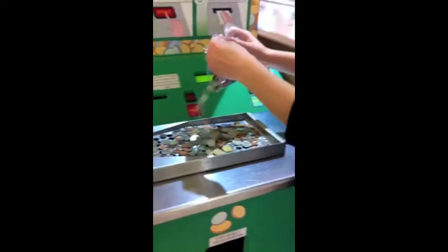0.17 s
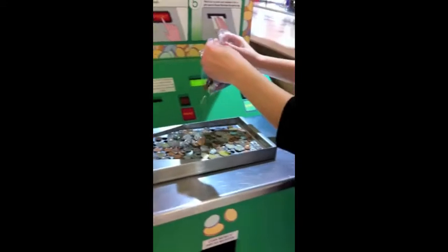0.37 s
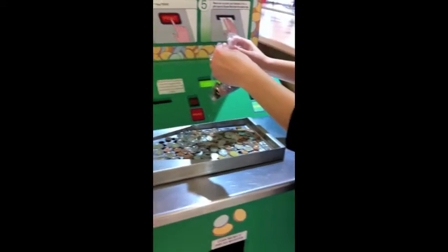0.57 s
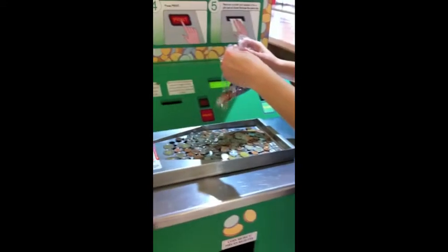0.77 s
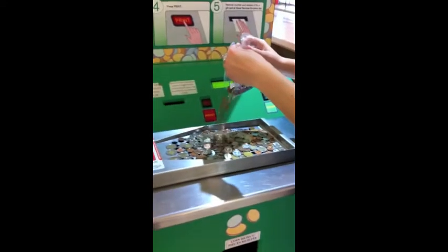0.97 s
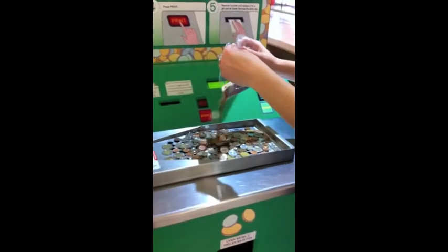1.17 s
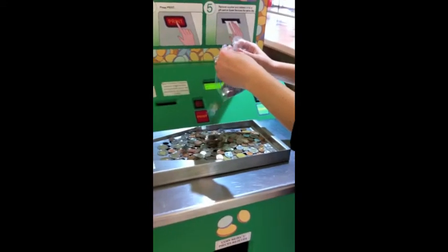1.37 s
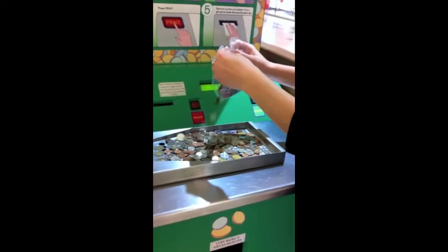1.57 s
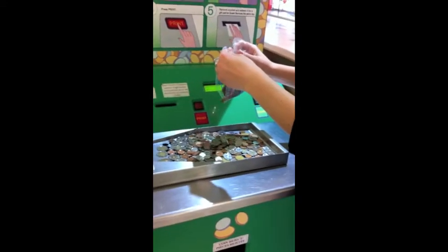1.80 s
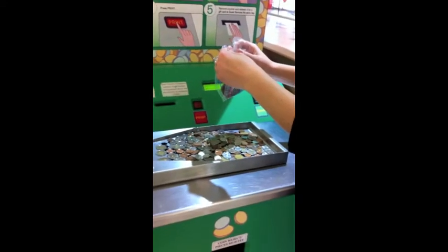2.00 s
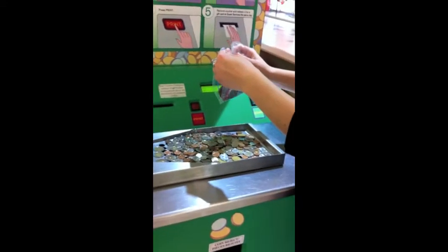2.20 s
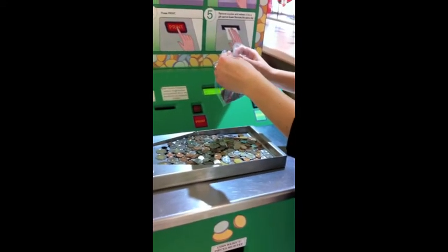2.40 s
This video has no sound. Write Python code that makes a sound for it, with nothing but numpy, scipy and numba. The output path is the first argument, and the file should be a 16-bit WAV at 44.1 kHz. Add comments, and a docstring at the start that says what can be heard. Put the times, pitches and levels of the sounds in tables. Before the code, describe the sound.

Coins pour from a bag onto a heap in a steel tray, clattering and jingling.

```python
"""Coins are shaken out of a bag onto a heap of coins in the steel tray of a counting machine, indoors.
After a faint rustle of the bag they land in clumps, each a quick flurry of hits, while loose coins
trickle and slide in between. Every hit clacks, rings a coin and knocks the tray, and heavier clumps
thud the cabinet. The room adds a short echo and a low, steady rumble."""
import sys
import numpy as np
from scipy import signal
from scipy.fft import rfft, irfft
from scipy.io import wavfile
from numba import njit

SR = 44100
rng = np.random.default_rng(int(sys.argv[2]) if len(sys.argv) > 2 else 0)


def wav_out(sig):
    """Save sig, one row per channel (or a flat mono array), as 16-bit PCM at SR to the path in sys.argv[1]."""
    wavfile.write(sys.argv[1], SR, np.round(np.clip(np.atleast_2d(sig).T, -1, 1) * 32767).astype(np.int16))


N = 108045

# Table levels are relative. A ring time (t60) is how long a sound takes to die down by 60 dB.
# A faint rustle of the bag (first row), then clumps of coins landing:
# t/s, coin level/dB, tray level/dB, time for the flurry to thin to about a third/s
FLURRIES = [(0.1806, -34, -35, 0.0072), (0.2259, -11.5, -29, 0.007), (0.3054, -13.5, -27, 0.0061),
            (0.312, -6, -38, 0.0046), (0.3465, -11, -30, 0.0066), (0.377, -9.5, -33, 0.0066),
            (0.386, -19.5, -45, 0.0053), (0.4694, -13, -27, 0.0063), (0.4823, -7.5, -26.5, 0.0064),
            (0.507, -14, -47, 0.0083), (0.5901, -10, -36, 0.0055), (0.6288, -18, -57, 0.008),
            (0.6718, -14.5, -36, 0.0068), (0.766, -10.5, -27, 0.0067), (0.8458, -9.5, -25.5, 0.0065),
            (0.9297, -16.5, -32.5, 0.0065), (1.0161, -14, -31.5, 0.009), (1.0265, -8.5, -26.5, 0.0063),
            (1.0442, -9, -35, 0.0061), (1.0824, -14.5, -48, 0.0063), (1.1008, -10.5, -46, 0.0078),
            (1.1335, -10.5, -48, 0.0065), (1.1562, -11.5, -32, 0.0054), (1.2103, -14.5, -33, 0.0054),
            (1.3018, -15.5, -25, 0.0091), (1.3171, -11, -35, 0.0061), (1.3556, -11.5, -40, 0.006),
            (1.4036, -14.5, -31, 0.0054), (1.5058, -11, -23.5, 0.007), (1.5156, -9, -45, 0.0058),
            (1.6023, -11, -29, 0.0071), (1.7439, -11.5, -29, 0.0063), (1.7905, -20.5, -36, 0.0065),
            (1.857, -14, -33, 0.0059), (1.8947, -20.5, -34.5, 0.0058), (1.921, -19, -37, 0.0046),
            (1.9671, -9.5, -23.5, 0.0057), (2.0217, -15.5, -38, 0.0066), (2.062, -23.5, -36, 0.0055),
            (2.1256, -21, -32.5, 0.0079), (2.1428, -14, -34.5, 0.0067), (2.1976, -25, -41, 0.0065),
            (2.2349, -48, -32.5, 0.0061), (2.2885, -35, -45, 0.0079), (2.306, -36, -46, 0.0049),
            (2.3344, -31, -50, 0.0056), (2.3506, -31, -58, 0.0077), (2.384, -37, -47.5, 0.0055)]

def flurries(hits=36, scatter_db=5, gain_db=-7):
    """The bag's rustle and each clump are hits that thin out. Gives times, force on coins, on tray."""
    all_hits = []
    for start, coin_db, tray_db, thinning_s in FLURRIES:
        share_done = (np.arange(hits) + rng.random(hits)) / (hits + 1)
        times = start - thinning_s * np.log(1 - share_done)
        force = unit(gain(scatter_db * rng.standard_normal(hits))) * rng.choice([-1, 1], hits)
        force *= np.sqrt(2 * thinning_s * SR) * gain(gain_db)
        all_hits.append([times, force * gain(coin_db), force * gain(tray_db)])
    return np.hstack(all_hits)


# How strongly the loose coins trickle and slide: t/s, level/dB
LOOSE_FLOW = [(0.02,-42.5),(.08,-42.5),(.16,-37.5),(.29,-79),(.36,-19),(.5,-21.5),(.57,-21.5),(.66,-27.5),(.74,-33.5),(.91,-31),(1.0,-24),(1.05,-21.5),(1.15,-16.5),(1.28,-23.5),(1.35,-18.5),(1.43,-21),(1.49,-35.5),(1.55,-21),(1.72,-27),(1.81,-23.5),(1.95,-55),(2.05,-26),(2.1,-34.5),(2.18,-32.5),(2.23,-44.5),(2.39,-49.5),(2.43,-75)]

def trickle(hits=3600, hits_per_s=800, scatter_db=5, coin_db=-3.5, tray_db=-25.5):
    """Loose coins hit at random moments, harder while more of them flow."""
    times = np.cumsum(rng.exponential(1, hits)) / hits_per_s
    scatter = np.clip(rng.standard_normal(hits), -2, 2)
    force = unit(gain(scatter_db * scatter)) * rng.choice([-1, 1], hits)
    flow_db = np.interp(times, *np.array(LOOSE_FLOW).T)
    force *= np.sqrt(hits * SR / hits_per_s) * gain(flow_db)
    return np.array([times, force * gain(coin_db), force * gain(tray_db)])


# The bright tone of one coin clacking on another: f/Hz, level/dB
CLACK_TONE = [(60,-46),(300,-33),(700,-16),(1500,-13),(2500,-13.5),(3500,-12),(5000,-5.5),(7000,-6),(8500,-6),(10800,1),(12500,-2),(14000,-5),(15600,1)]

def clacks(times, force, groups=8, rattle_t60=0.061, rattle_db=3, gain_db=-4.5):
    """Every hit is a hard clack with a tiny rattle of the coins around it."""
    clatter = np.zeros(N)
    for k in range(groups):  # each group of hits gets a rattle of its own
        pushes = clicks(times[k::groups], force[k::groups])
        rattle = unit(noise_burst(rattle_t60))
        clatter += pushes + gain(rattle_db) * through(pushes, rattle)
    return gain(gain_db) * through(clatter, tone_filter(CLACK_TONE))


# The pitch ranges in which coins ring: lowest f/Hz, highest f/Hz, level/dB
COIN_PITCHES = [(2919,7600,-4.5),(6823,11500,-2.5),(10500,15000,2.5),(12670,18000,-5.5)]

def jingle(times, force, typical_t60=0.053, spread=0.35, gain_db=-4.5):
    """Every struck coin rings at its own pitches, one picked at random from each range."""
    # Ring times vary by chance: short for a coin lying in the heap, longer for one flying free.
    t60 = typical_t60 * np.exp(spread * np.clip(rng.standard_normal(len(times)), -2, 2))
    decay = np.log(1000) / (t60 * SR)
    starts = np.maximum(times * SR, 0).astype(int)
    lengths = (t60 * SR).astype(int)
    low, high, db = np.array(COIN_PITCHES).T
    pitches = low + (high - low) * rng.random((len(times), len(low)))
    strength = 2 * np.sqrt(decay) * force * gain(gain_db)
    return sum(add_rings(starts, lengths, hz, decay, strength * share)
               for hz, share in zip(pitches.T, unit(gain(db))))


# The notes of the steel tray with coins lying on it: f/Hz, ring time/s, level/dB
TRAY_NOTES = [(348.6,0.18,-4),(459,0.04,-11),(683,0.095,-9.5),(839,0.062,1),(930,0.031,-0.5),(1012,0.053,-0.5),(1157,0.055,2),(1220,0.024,1.5),(1348,0.038,0),(1403,0.063,-7),(1751,0.071,-5),(1960,0.014,-9),(2200,0.042,-4.5),(2304,0.09,-3.5),(3020,0.047,-8.5)]

def tray(times, force, bass_cut_hz=345, gain_db=1):
    """The steel tray knocks briefly, muffled by the heap on it, and gives off little bass."""
    t = np.arange(SR // 2) / SR
    knock = np.zeros(len(t))
    for k, (hz, t60, db) in enumerate(TRAY_NOTES):
        note = unit(fade(t60) * np.sin(2 * np.pi * hz * t))
        knock += (-1) ** k * gain(db) * note  # every other note starts by swinging the opposite way
    knock = signal.sosfilt(signal.butter(2, bass_cut_hz, "high", fs=SR, output="sos"), knock)
    return gain(gain_db) * through(clicks(times, force), unit(knock))


# Heavier clumps shaking the cabinet: t/s, level/dB
HEAVY_LANDINGS = [(0.249, -46), (0.299, -56), (0.589, -61), (0.839, -59), (0.919, -55), (1.306, -39),
                  (1.594, -72), (1.739, -50), (1.966, -52), (2.095, -48)]

def cabinet(cutoff_hz=55, t60=0.089, gain_db=-5):
    """The machine's cabinet gives a dull thud under the heavier clumps."""
    times, db = np.array(HEAVY_LANDINGS).T
    thud = signal.sosfilt(signal.butter(2, cutoff_hz, fs=SR, output="sos"), noise_burst(t60))
    return through(clicks(times, gain(db + gain_db)), thud / np.abs(thud).max())


def room(sound, t60=0.26, delay_s=0.017, echo_db=-8.5):
    """Sound bounces off the machine front and the walls, adding a short, blurred echo."""
    build_up = np.clip(np.arange(SR // 2) / SR / delay_s - 0.5, 0, 1)
    echo = unit(build_up * noise_burst(t60))
    return sound + gain(echo_db) * through(sound, echo)


# The tone of the hall's steady background: f/Hz, level/dB
RUMBLE_TONE = [(25,-48),(60,-37),(95,-17.5),(140,-8),(207,0),(300,-4.5),(420,-1.5),(560,-5.5),(978,-8.5),(1350,-9.5),(2240,-13.5),(5000,-32),(12800,-57),(15500,-50)]

def hall_rumble(gain_db=-44.5):
    """A low, steady noise fills the hall."""
    return gain(gain_db) * through(rng.standard_normal(N), tone_filter(RUMBLE_TONE))


def gain(db):
    """Turn decibels into a number to multiply by."""
    return 10 ** (np.asarray(db) / 20)


def unit(x):
    """Scale to an energy of 1."""
    return x / np.sqrt(np.sum(x ** 2) + 1e-18)


def through(sound, response):
    """Play a sound through something that answers a single click with this response."""
    return signal.fftconvolve(sound, response)[:N]


def fade(t60):
    """Half a second of a curve that falls by 60 dB every t60 seconds."""
    return np.exp(-np.log(1000) * np.arange(SR // 2) / SR / t60)


def noise_burst(t60):
    """A puff of noise that dies away."""
    return fade(t60) * rng.standard_normal(SR // 2)


def clicks(times, force):
    """Pushes one sample long at the given times."""
    return np.bincount(np.maximum(times * SR, 0).astype(int), force, N)[:N]


def tone_filter(points, size=4096):
    """A short response of energy 1 whose tone follows the (f/Hz, level/dB) points."""
    hz, db = np.array(points).T
    grid_hz = np.maximum(np.arange(size // 2 + 1) * SR / size, 1)
    curve_db = np.interp(np.log(grid_hz), np.log(hz), db)
    # These steps keep the tone but pack the energy at the start, so clicks stay sharp.
    folded = irfft(np.log(gain(curve_db)))
    folded[1:size // 2] *= 2
    folded[size // 2 + 1:] = 0
    return unit(irfft(np.exp(rfft(folded))))


@njit
def add_rings(starts, lengths, hz, decay, strength):
    """Add up pure tones that die away. Starts and lengths are in samples; decay is per sample."""
    sound = np.zeros(N)
    for k in range(len(starts)):
        swing = strength[k] + 0j
        step = np.exp(-decay[k] + 2j * np.pi * hz[k] / SR)  # shrinks and turns the swing a little
        for i in range(starts[k], min(starts[k] + lengths[k], N)):
            swing *= step
            sound[i] += swing.imag
    return sound


def scene():
    """The bag rustles, then coins strike the heap and the tray, amid the room's echo and rumble."""
    times, on_coins, on_tray = np.hstack([trickle(), flurries()])
    pour = clacks(times, on_coins) + jingle(times, on_coins) + tray(times, on_tray) + cabinet()
    return (room(pour) + hall_rumble())[None]


def record(dry):
    """The sound fades in and its very highest treble is cut."""
    fade_in_s, top_hz = (0.02, 0.14), 15650
    opening = np.interp(np.arange(N) / SR, fade_in_s, [0, 1])
    treble_cut = signal.ellip(12, 0.2, 80, top_hz, fs=SR, output="sos")
    return signal.sosfilt(treble_cut, dry * opening)


dry = scene()
out = record(dry)
wav_out(out)
```